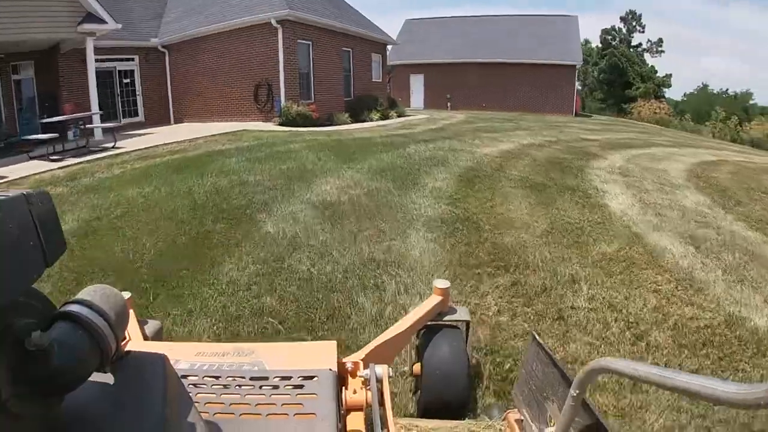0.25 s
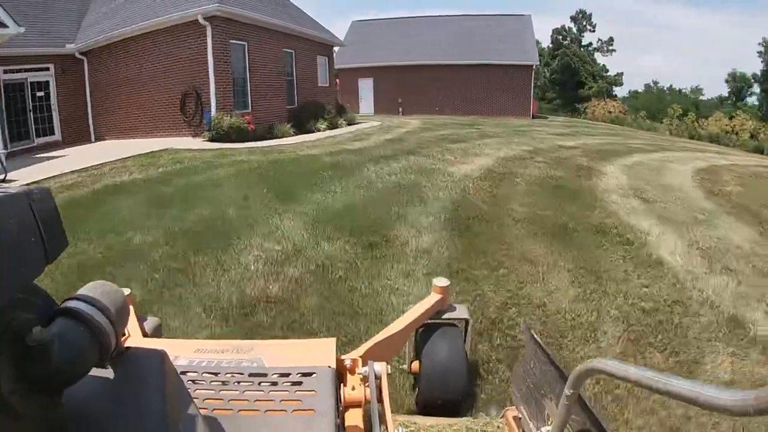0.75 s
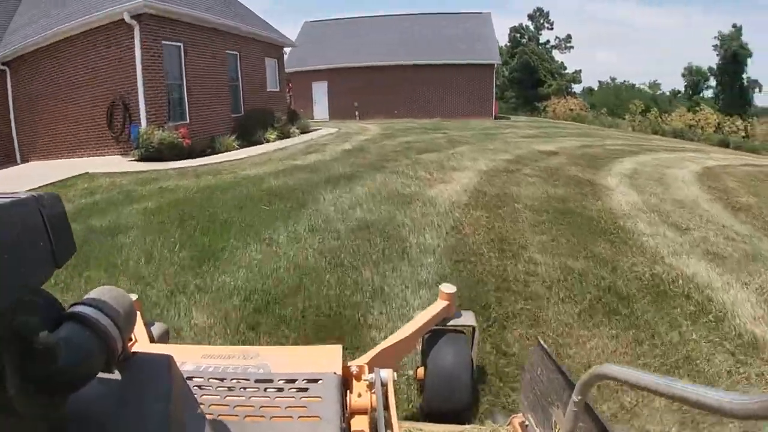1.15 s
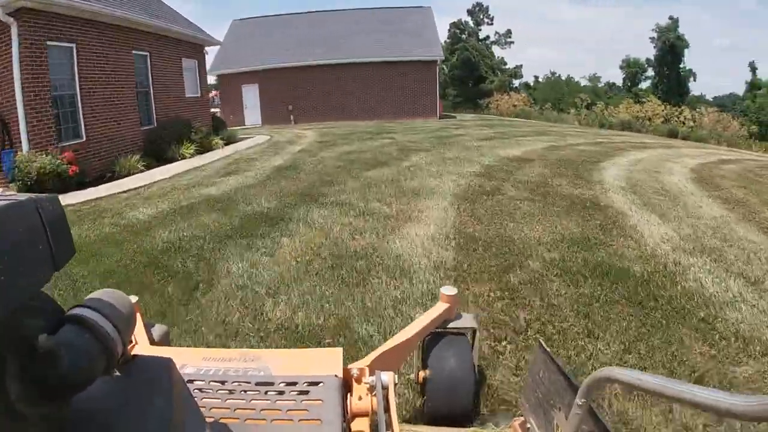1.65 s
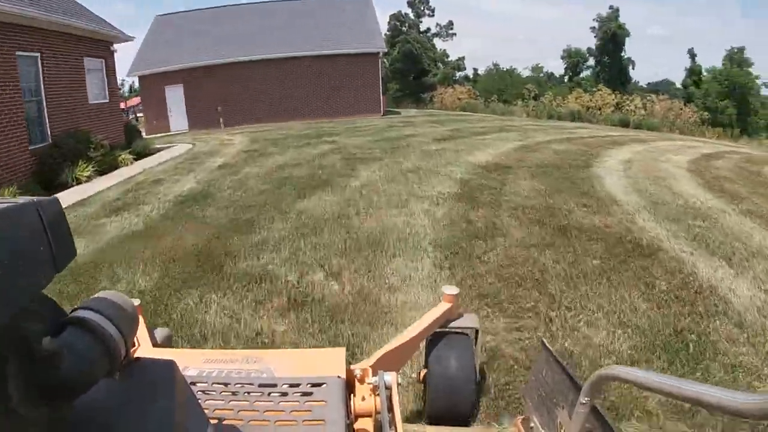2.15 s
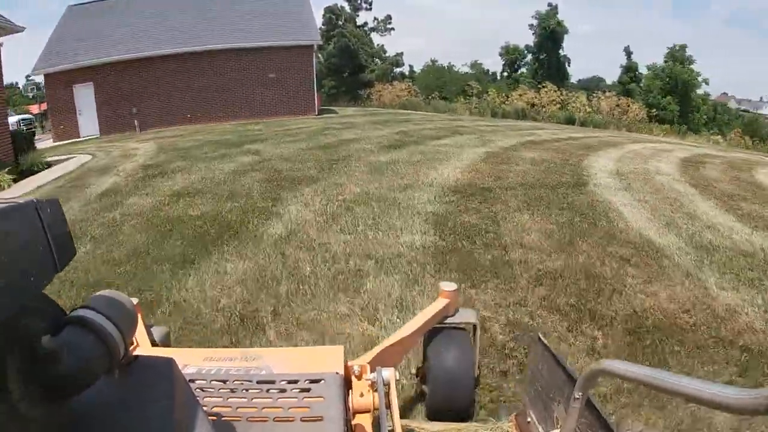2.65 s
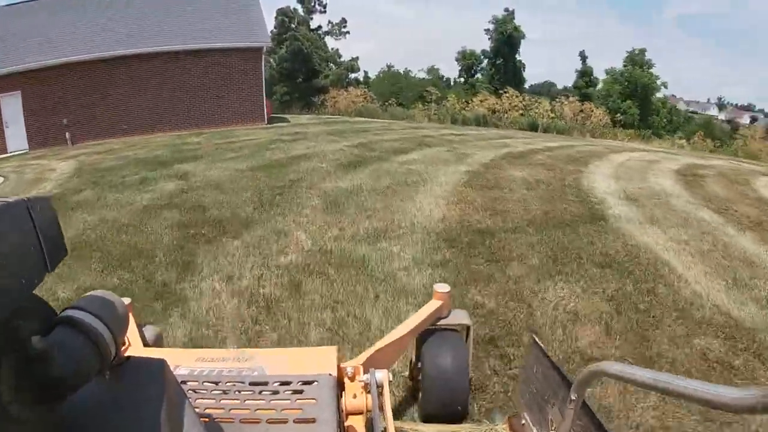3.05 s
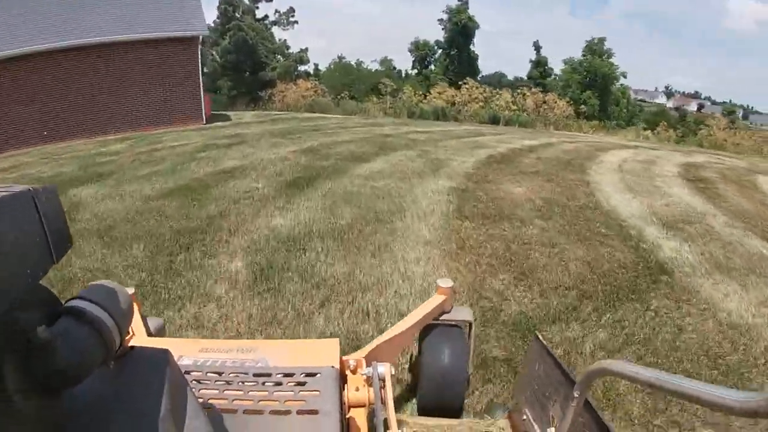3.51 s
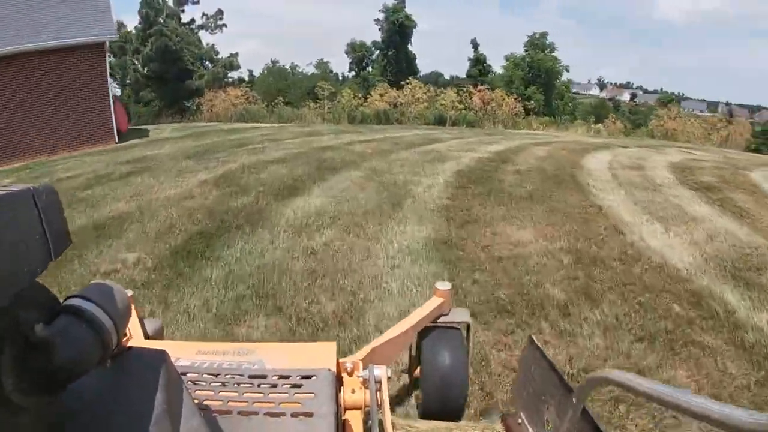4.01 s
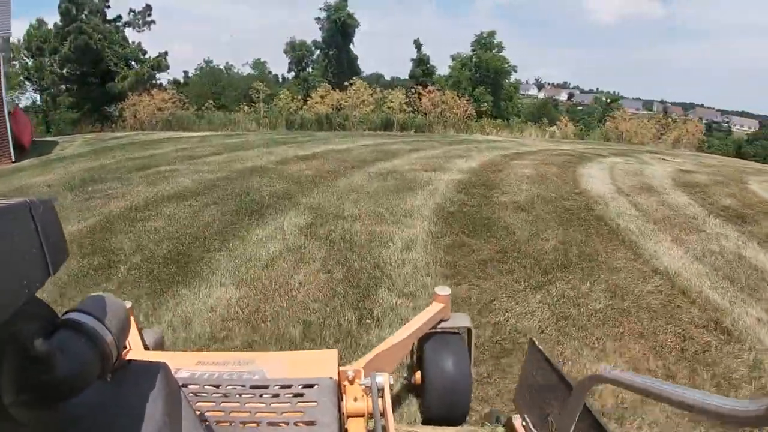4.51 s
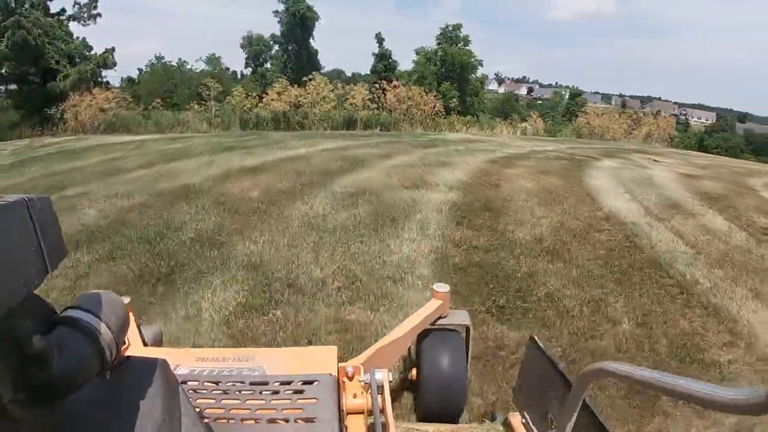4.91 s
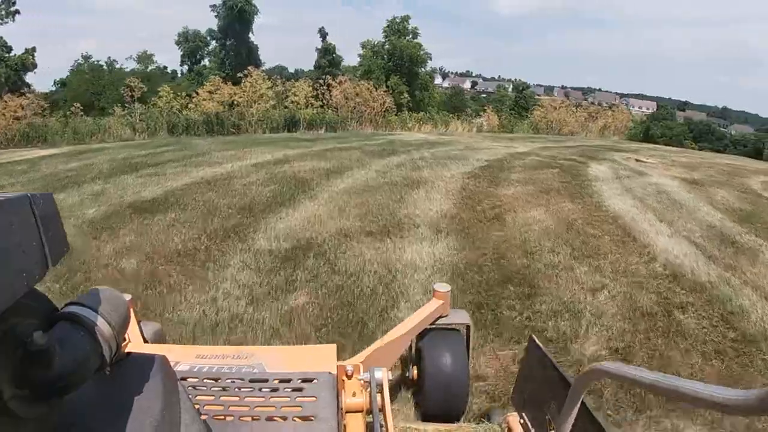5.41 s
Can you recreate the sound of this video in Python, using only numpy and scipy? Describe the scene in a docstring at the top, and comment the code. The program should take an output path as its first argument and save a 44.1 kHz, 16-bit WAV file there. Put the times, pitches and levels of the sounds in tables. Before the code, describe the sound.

A riding mower runs at full throttle throughout, heard close from the driver's seat on an open lawn beside brick buildings. The twin-cylinder engine gives a thick, low, buzzing drone at nearly constant pitch, with muffler boom, gear clatter and a fan whine. Under it the cutting deck roars with churned air, and three blades hum, beating slowly as they slip in and out of step. Grass hisses brightly and ticks on steel. The roar rises over the first second and is fullest around 2 to 3 seconds, when a high whistle is also strongest and the engine pitch edges up very slightly. Low thuds with light metal rattles come at about 0.3 seconds, in a cluster from 1.4 to 2.6, and again from 3.7 to 4.1. From 3.5 the roar and exhaust ease, thinnest near 4.7; the exhaust drone then recovers by the end, still running.

```python
"""A V-twin engine drones at full throttle: a riding mower crosses a lawn, heard from the seat.
Harmonic lines locked to the shafts give the engine, its fan and three blades that drift in and out of step.
Filtered noise gives the deck's roar and the hiss of grass, which also ticks against the steel;
decaying thuds and rattles give the bumps. The roar eases as the mower moves out into the open."""
import sys
import numpy as np
from scipy import signal
from scipy.fft import rfft, irfft
from scipy.io import wavfile

SR = 44100
rng = np.random.default_rng(int(sys.argv[2]) if len(sys.argv) > 2 else 0)


def unload_audio(sound):
    """Save the sound as a 16-bit wav file, at the path given as the first command line argument."""
    columns = np.transpose(np.atleast_2d(sound))
    # keep every value between -1 and 1, then stretch to whole-number steps
    steps = np.round(np.clip(columns, -1, 1) * 32767)
    wavfile.write(sys.argv[1], SR, steps.astype(np.int16))


N = 250047
T = np.arange(N) / SR


def gain_of(db):
    """Level definition: an amplitude ratio is 10 to the power dB/20."""
    return 10 ** (np.asarray(db) / 20)


def evened(x):
    """Power normalisation: scales x to rms 1."""
    return x / np.sqrt(np.mean(x ** 2) + 1e-20)


def curves(rows):
    """Linear interpolation: each column of a timed table, at every sample."""
    s, *columns = np.transpose(rows)
    return [np.interp(T, s, column) for column in columns]


def colour(x, points):
    """Spectral shaping: filters x by the curve in points, interpolated over log frequency, at rms 1."""
    hz, db = np.transpose(points)
    f = np.fft.rfftfreq(len(x), 1 / SR)
    response_db = np.interp(np.log(f + 1), np.log(hz), db, right=-90)
    return evened(irfft(rfft(x) * gain_of(response_db), len(x)))


def drift(hz):
    """Low-passed noise: a smooth random path of rms 1 that changes about hz times a second."""
    path_rate = 512  # points per second
    f = np.fft.rfftfreq(4096, 1 / path_rate)
    noise = rng.standard_normal(2 * len(f) - 2)
    path = irfft(rfft(noise) / (1 + (f / hz) ** 2))
    return evened(np.interp(T * path_rate, np.arange(len(path)), path))


def tones(turns, orders, waver, waver_hz, smear=None):
    """Harmonic synthesis: lines on multiples of a shaft's turning, wavering in strength and phase.

    With smear, phases quadratic in order form pulses that a pipe has spread out in time."""
    out = np.zeros(N)
    for order, db in orders:
        start = rng.random() if smear is None else smear * order ** 2
        angle = 2 * np.pi * (order * turns + start)
        in_phase = (1 + waver * drift(waver_hz)) * np.cos(angle)
        quadrature = waver * drift(waver_hz) * np.sin(angle)
        out += gain_of(db) * (in_phase + quadrature)
    return out * np.sqrt(2 / (1 + 2 * waver ** 2))  # makes each table level an rms level


def add(mix, s, sound):
    """Superposition: adds a sound into the mix at s seconds."""
    part = mix[max(round(s * SR), 0):][:len(sound)]
    part += sound[:len(part)]


# Shaking of the engine block [multiple of the four-stroke cycle, level/dB]
SHAKE = [(1, -37.5), (2, -25), (3, -39), (4, -40.5)]
# Exhaust note before its gains: four drone lines, then the rasp [multiple of the cycle, level/dB]
EXHAUST = [(5, -17.5), (6, -24.5), (7, -26), (8, -43), (10, -37), (11, -43), (12, -41.5), (13, -38),
           (14, -68), (15, -45.5), (16, -36), (17, -43), (18, -41.5), (19, -39)]
# Gain of the exhaust drone and muffler boom [t/s, gain/dB]
EXHAUST_LEVEL = [(0, -0.5), (1.65, 0.5), (1.95, -.5), (3.0, 1), (3.9, -8.5), (4.6, -5), (4.95, -6.5),
                 (5.45, .3)]
# Muffler resonance [f/Hz, relative level/dB]
BOOM = [(80, -16), (130, -10.5), (160, -1.5), (205, -2.5), (240, -6), (262, -12), (400, -31.5)]
# Whirr of the drive before the roar scales it [multiple of the cycle, level/dB]
WHIRR = [(33, -44), (35, -40), (36, -40.5), (42, -44), (43, -44), (83, -47.5), (84, -44), (85, -46.5),
         (91, -45), (92, -50)]


def engine(cycles, rush, chute_db):
    """Periodic forcing: block shake, exhaust and drive whirr are harmonics of the four-stroke cycle."""
    exhaust_db, = curves(EXHAUST_LEVEL)
    shake = -tones(cycles, SHAKE, waver=0.12, waver_hz=6.5, smear=0.253)
    drone = -tones(cycles, EXHAUST[:4], waver=0.091, waver_hz=3.5, smear=.25)  # two chugs a cycle
    boom = gain_of(-23.5) * colour(rng.standard_normal(N), BOOM)  # rushing gas booms in the muffler
    exhaust = gain_of(exhaust_db) * (drone + boom)
    rasp_gain = rush ** 0.48 * gain_of(0.39 * chute_db)  # swells as the chute resounds
    rasp = rasp_gain * tones(cycles, EXHAUST[4:], waver=0.14, waver_hz=10.0)
    whirr = rush ** 1.1 * tones(cycles, WHIRR, waver=0.55, waver_hz=17)
    return shake + exhaust + rasp + whirr


FAN_ORDER = 48  # 24 flywheel vanes, two turns a cycle
# Level of the fan's upper whistle [t/s, level/dB]
WHISTLE_LEVEL = [(0, -56), (.62, -44), (2.25, -43), (2.6, -40.5), (3.4, -38.5), (3.75, -48), (4.3, -45),
                 (5, -53)]


def fan(cycles, rush, whine_db=-36.0):
    """Vane-passing tone: the flywheel's vanes whine, with a whistle an octave above."""
    whistle_db, = curves(WHISTLE_LEVEL)
    flywheel = cycles + 0.00093 * drift(10.0)
    whine = tones(flywheel, [(FAN_ORDER, 0)], waver=0.3, waver_hz=16)
    whistle = tones(flywheel, [(2 * FAN_ORDER, 0)], waver=0.84, waver_hz=12)
    return gain_of(whine_db) * rush ** 1.35 * whine + gain_of(whistle_db) * whistle


# Knocking of gears and tappets [f/Hz, relative level/dB]
CLATTER = [(600, -22), (900, 3), (1450, 1.5), (2200, -0.5), (3100, -7.5), (3500, -7.5), (5500, -20),
           (8000, -26), (10000, -34.5)]


def clatter(cycles):
    """Cyclic repetition: gears and tappets repeat nearly the same pattern of tiny knocks in every cycle."""
    pattern = irfft(np.exp(2j * np.pi * rng.random(731)))  # orders of equal strength, random phase
    place = (cycles + 0.00047 * drift(12)) % 1 * len(pattern)
    return colour(np.interp(place, np.arange(len(pattern)), pattern), CLATTER)


# Bright puffs at the valves [f/Hz, relative level/dB]
VALVE_HISS = [(2000, -12), (5000, 8), (8000, 3.5), (10000, -9.5), (11500, -9), (13000, -5.5), (14200, -10),
              (15600, -22)]


def valves(cycles):
    """Modulated flow noise: each cylinder spits a gritty puff once a cycle, the two unevenly spaced."""
    first = np.exp(-((cycles - .02) % 1) / 0.13)  # positions and decays in cycles
    second = 0.63 * np.exp(-((cycles - .47) % 1) / 0.12)
    grit_db = 1.1 * drift(60) + 2.7 * rng.standard_normal(N)
    grit = rng.standard_normal(N) * gain_of(grit_db)
    return colour(grit * (0.19 + first + second), VALVE_HISS)


# Hum of one blade [multiple of the blade-pass rate, level/dB]
BLADES = [(1, -18.5), (2, -25.5), (3, -34)]
# Other spindle overtones before the roar scales them [multiple of spindle speed, level/dB]
SPINDLE = [(1, -48), (3, -28), (8, -33), (10, -42), (12, -39.5), (14, -47)]


def blades(turns, rush):
    """Blade-pass interference: two tips pass per turn, and each harmonic swells and fades with the slip."""
    hum = np.zeros(N)
    for order, db in BLADES:
        line = tones(turns, [(2 * order, 0)], waver=0.039 * order * order, waver_hz=9.6)
        hum += gain_of(db) * in_step(order) * line
    return hum + rush ** 0.77 * tones(turns, SPINDLE, waver=0.68, waver_hz=2.4)


# The belt creeps, so the outer blades slip against the middle one
# [t/s, lag of one/blade passes, lag of the other/blade passes]
SLIP = [(0, .922, 0.47), (.67, 0.74, 0.48), (1.08, 0.6, .601), (1.44, .659, .489), (1.92, .75, .47),
        (2.44, 0.46, 0.47), (2.9, .43, 0.46), (3.4, 0.26, 0.29), (3.6, 0.24, 0.11), (4.68, .29, 0.15),
        (5.0, 0.34, 0.08), (5.18, 0.43, 0.15), (5.67, 0.576, 0.058)]
# Strengths of the outer blades, the middle blade being 1 [one, the other]
OUTER_BLADES = (0.81, 0.76)


def in_step(order):
    """Phasor addition: the three blades nearly cancel or reinforce at one harmonic, as their lags decide."""
    phasors = 1
    for size, lag in zip(OUTER_BLADES, curves(SLIP)):
        phasors = phasors + size * np.exp(2j * np.pi * order * lag)
    return abs(phasors)


# Air churned under the deck [f/Hz, relative level/dB]
ROAR = [(20, 0), (90, 3.5), (270, -4.5), (380, -4.5), (520, -1), (900, -2.5), (1200, -7.5), (1450, -3),
        (1650, -6.5), (2200, -8), (2700, -13), (3130, -7.5), (3400, -25), (5000, -44)]
# Low resonance of the discharge chute [f/Hz, relative level/dB]
CHUTE = [(250, -12.5), (310, -7), (355, 0), (410, 2), (470, -3), (520, -5), (600, -14)]
# Hollow resonance of the deck [f/Hz, relative level/dB]
HOLLOW = [(450, -33), (610, -7), (680, -1), (730, -6), (790, 5), (850, -10), (1100, -44)]
# Engine orders that ring in the hollow [multiple of the four-stroke cycle, relative level/dB]
RING = [(21, -10.5), (22, -10), (23, -6), (24, -5), (25, -9.5), (26, -16)]
# Level of the hollow ring relative to the roar's course [t/s, gain/dB]
HOLLOW_LEVEL = [(0, -3.5), (1.1, -1.5), (1.55, 3.5), (1.9, -10), (2.38, 0.5), (3.1, -8.5), (3.5, -2.5),
                (3.9, -9), (5.67, -4)]


def deck(cycles, rush, flutter_db, chute_db, roar_db=-23.5):
    """Turbulence and cavity resonance: churned air roars, and chute and hollow deck ring."""
    hollow_db, = curves(HOLLOW_LEVEL)
    throb = 1 + 0.017 * np.cos(2 * np.pi * cycles)
    roar = gain_of(roar_db + flutter_db) * colour(rng.standard_normal(N) * throb, ROAR)
    chute = gain_of(-32.0) * colour(rng.standard_normal(N), CHUTE)
    hollow_air = gain_of(-34.0) * colour(rng.standard_normal(N), HOLLOW)
    engine_ring = gain_of(-26.5) * tones(cycles, RING, waver=0.29, waver_hz=12)
    hollow = gain_of(hollow_db) * (hollow_air + engine_ring)
    return rush * (roar + hollow) + gain_of(chute_db) * chute


# Hiss and ticks of cut grass [f/Hz, relative level/dB]
HISS = [(1500, -34), (3000, -2.5), (3700, 3.5), (5300, 1.5), (7000, -4), (8300, -10.5), (9800, -19.5),
        (12500, -16.5), (15500, -31)]


def grass(per_s=350, spread_db=3):
    """Random impacts and flow noise: cut stalks hiss through the chute, and some tick against the steel."""
    sizes_db = spread_db * np.minimum(rng.exponential(1, N), 4)
    sizes = gain_of(sizes_db) * rng.choice([-1, 1], N)
    ticks = colour(sizes * (rng.random(N) < per_s / SR), HISS)
    hiss = colour(rng.standard_normal(N), HISS)
    return gain_of(-1.5) * hiss + gain_of(-11.5) * ticks


def bodywork(x, reach_s=0.0065, count=8):
    """Comb filtering: short reflections off frame and footplate give the hiss a fine, metallic ripple."""
    echo = .09  # strength of each reflection relative to the direct sound
    taps = np.zeros(SR // 50)
    taps[0] = 1
    delays = rng.uniform(.05, 1, count) * reach_s * SR
    delays = np.clip(delays, 1, len(taps) - 1).astype(int)
    taps[delays] += echo * rng.choice([-1, 1], count)
    return signal.oaconvolve(x, taps / np.linalg.norm(taps))[:N]


# Jolts of the frame, levels before the decay [t/s, thud level/dB, rattle level/dB]
BUMPS = [(.333, -18, -32), (.768, -33, -37), (1.432, -24, -32), (1.559, -21, -34), (1.733, -25, -30),
         (1.944, -14, -30), (1.983, -27, -26), (2.236, -29, -32), (2.564, -21, -26.5), (3.668, -20, -32),
         (3.753, -23, -32), (4.114, -14, -37)]
# Sheet steel of the frame [f/Hz, relative level/dB]
RATTLE = [(300, -44), (900, -25), (1900, 8), (3200, 18), (5500, 6), (8000, 8.5), (10000, -32), (13000, -21),
          (15500, -35)]


def bumps(thud_hz=21, thud_s=0.017, rattle_s=0.014):
    """Damped oscillation: a jolt rocks the frame on its tyres and shakes loose steel."""
    t = np.arange(SR // 4) / SR
    out = np.zeros(N)
    for s, thud_db, rattle_db in BUMPS:
        thud = -np.sin(2 * np.pi * thud_hz * t) * np.exp(-t / thud_s)
        rattle = colour(rng.standard_normal(len(t)), RATTLE) * np.exp(-t / rattle_s)
        add(out, s, gain_of(thud_db) * thud + gain_of(rattle_db) * rattle)
    return out


# Governed engine speed before its small random drift [t/s, crankshaft turn rate f/Hz]
CRANK = [(0, 60.23), (.6, 60.25), (.9, 59.96), (1.6, 59.87), (2.1, 60.05), (2.65, 60.68), (3.9, 60.62),
         (5.1, 60.85), (5.67, 60.78)]
BELT = .93934  # blade spindle turns per crankshaft turn
# Gain of the deck's roar; hiss, clatter and whine rise and fall with it [t/s, gain/dB]
ROAR_LEVEL = [(0, -5), (.72, -.6), (1.5, -0.9), (2.2, 1), (3.48, -1.85), (3.95, -6), (4.7, -10), (5.67, -8)]
# Gain of the chute's low resonance [t/s, gain/dB]
CHUTE_LEVEL = [(0, -3.5), (1.1, 4.5), (1.7, -1), (2.85, 4), (3.42, 2.5), (3.75, -3), (4.48, -5.5),
               (4.76, 1), (5.67, -2)]


def scene(grass_db=-35, valves_db=-42, clatter_db=-30.5):
    """Kinematic coupling: the crankshaft drives valves at half speed and blades through the belt."""
    speed, = curves(CRANK)
    crank = np.cumsum(speed * (1 + 0.001023 * drift(6.37))) / SR
    cycles, spindle = crank / 2, crank * BELT
    roar_gain_db, = curves(ROAR_LEVEL)
    rush = gain_of(roar_gain_db)  # about 1 at full roar; layers follow it by their own powers
    chute_db, = curves(CHUTE_LEVEL)
    tufts = drift(28)  # uneven grass makes roar and hiss flutter together
    knocks = gain_of(clatter_db) * rush * clatter(cycles)
    motor = engine(cycles, rush, chute_db) + fan(cycles, rush) + knocks
    cutting = blades(spindle, rush) + deck(cycles, rush, 1.04 * tufts, chute_db)
    stalks = gain_of(grass_db + .95 * tufts) * grass()
    puffs = gain_of(valves_db) * valves(cycles)
    hiss = rush ** 0.94 * (stalks + puffs)
    return (motor + cutting + bodywork(hiss) + bumps())[None]


EDGE_HZ = 15650  # upper edge of the band


def record(dry):
    """Saturation and band limiting: rounds off the highest peaks, fades the ends, then low-passes."""
    rounded = dry / (1 + (dry / .9) ** 8) ** (1 / 8)
    faded = rounded * signal.windows.tukey(N, .001)
    low_pass = signal.firwin(511, EDGE_HZ, window=("kaiser", 9), fs=SR)
    return signal.oaconvolve(faded, low_pass[None], "same")


dry = scene()
out = record(dry)
unload_audio(out)
```